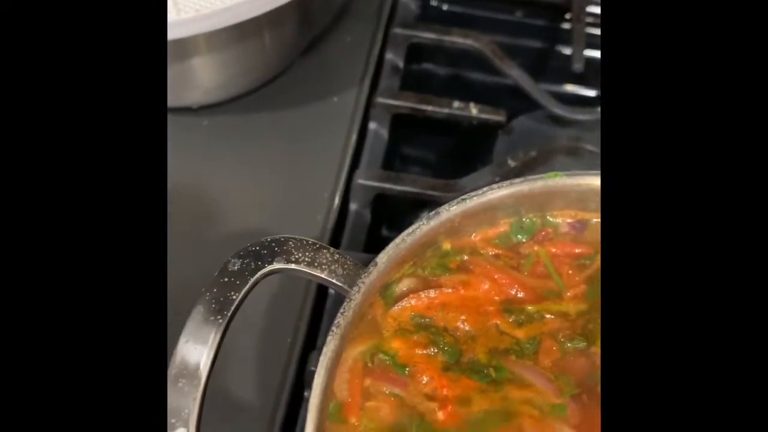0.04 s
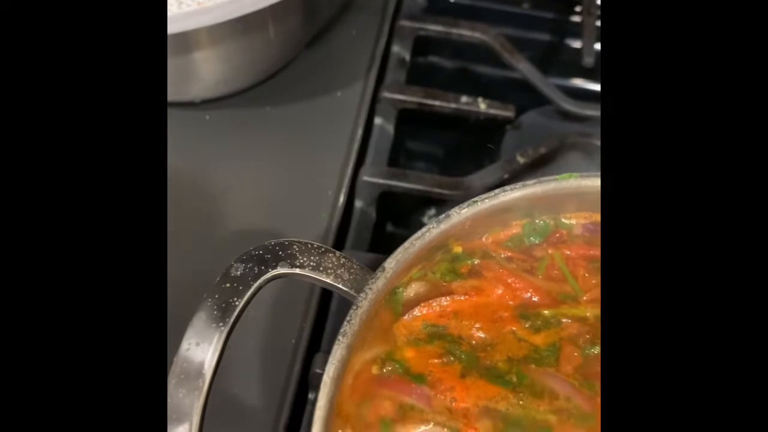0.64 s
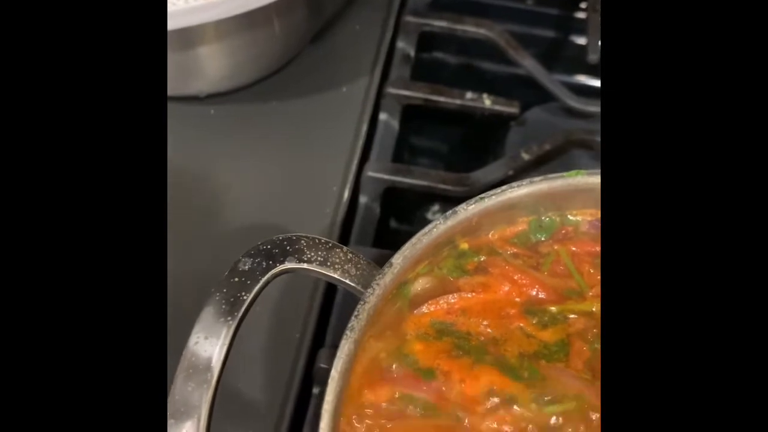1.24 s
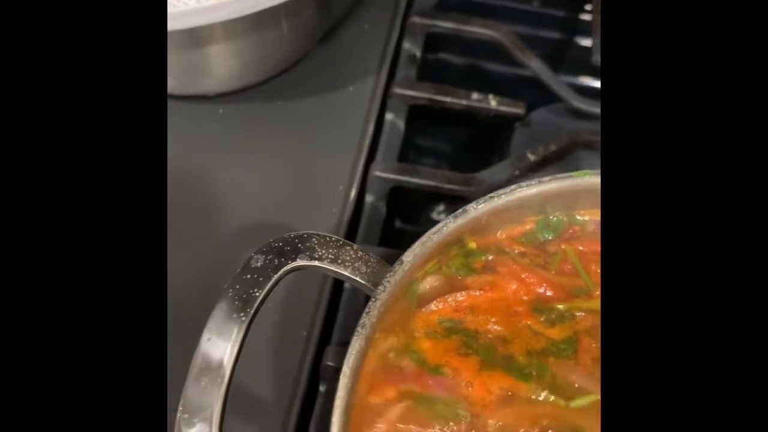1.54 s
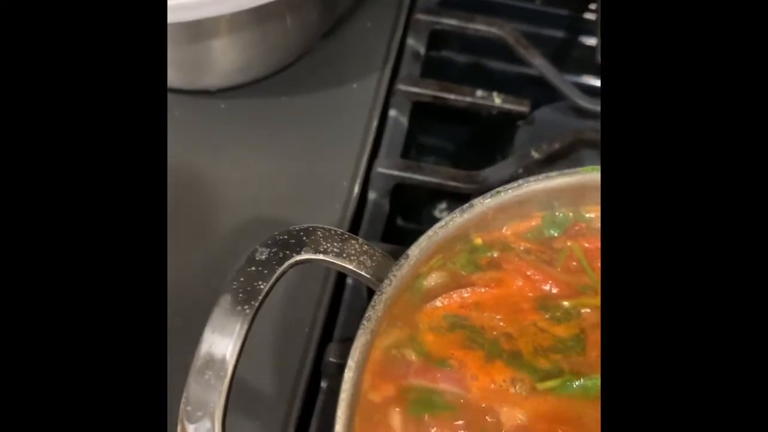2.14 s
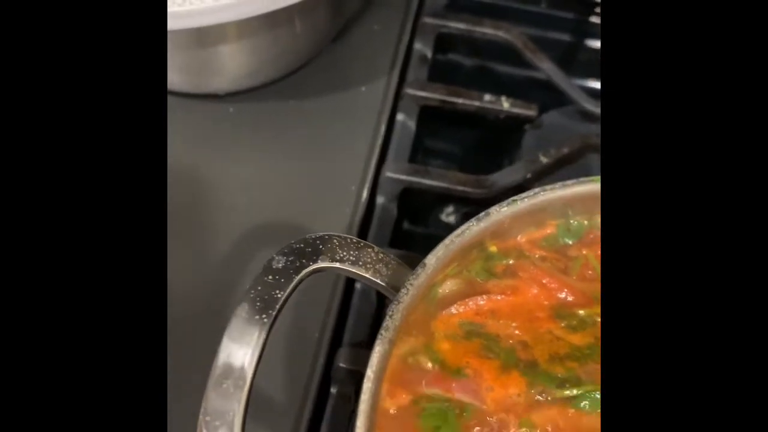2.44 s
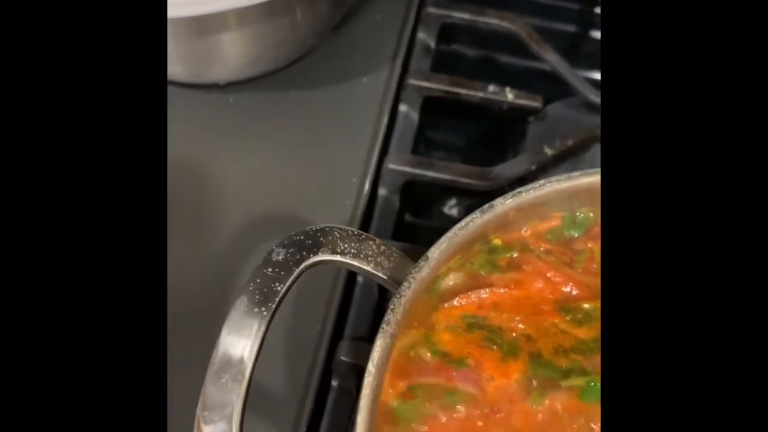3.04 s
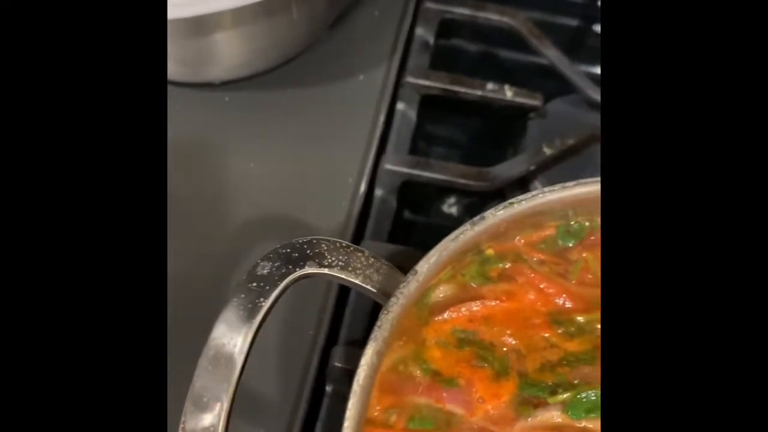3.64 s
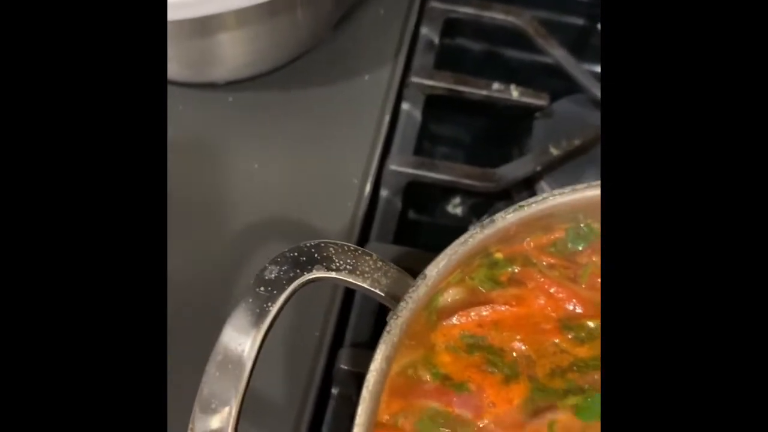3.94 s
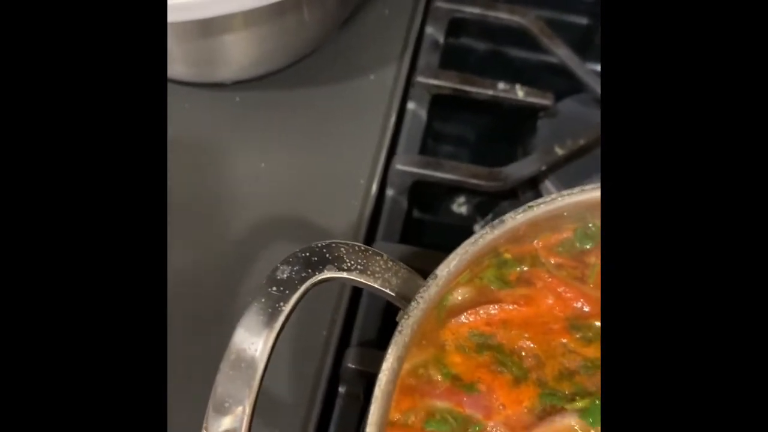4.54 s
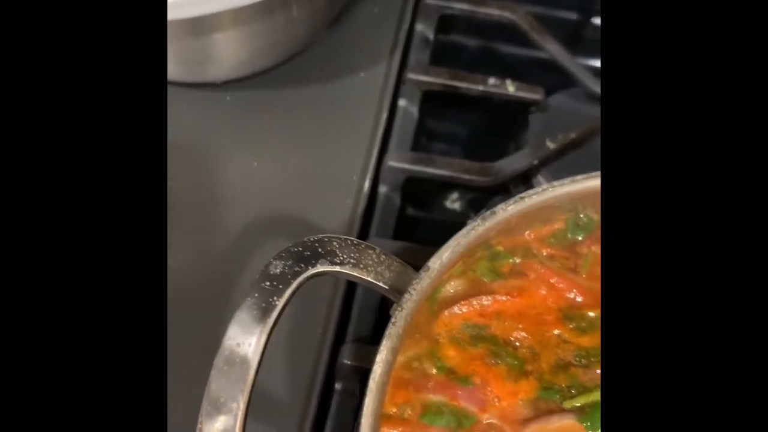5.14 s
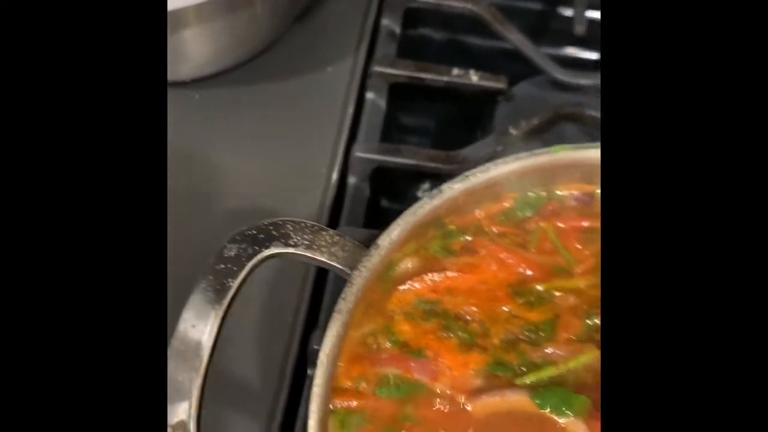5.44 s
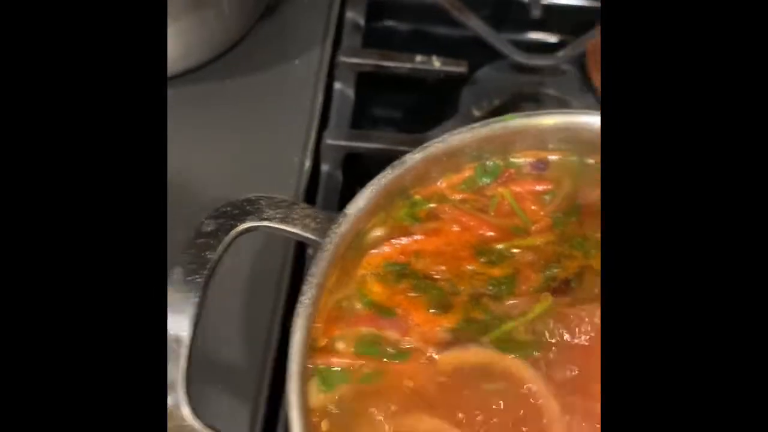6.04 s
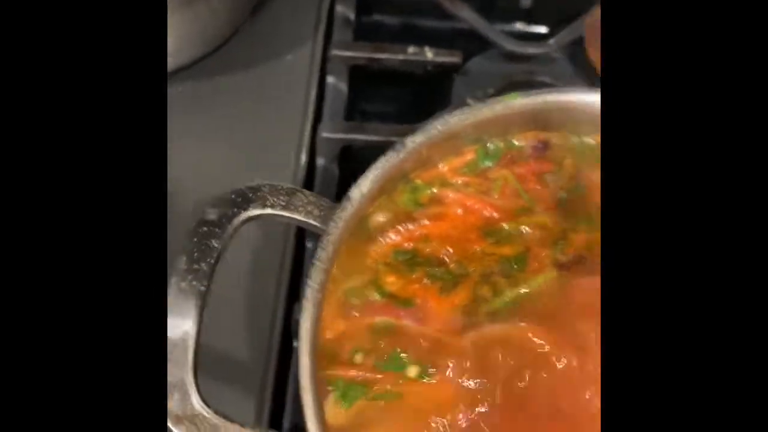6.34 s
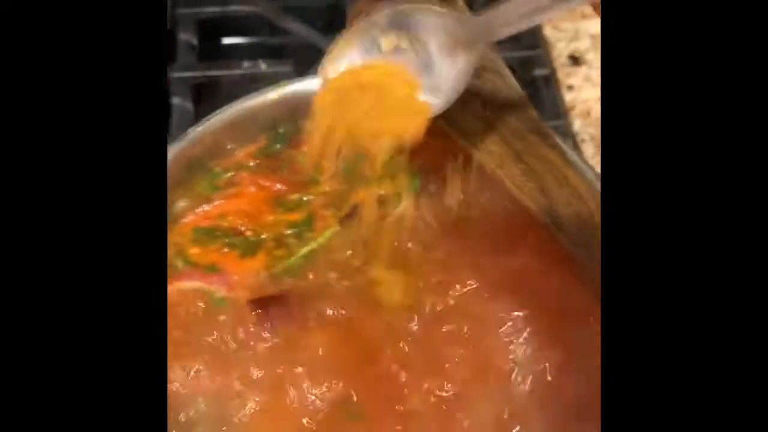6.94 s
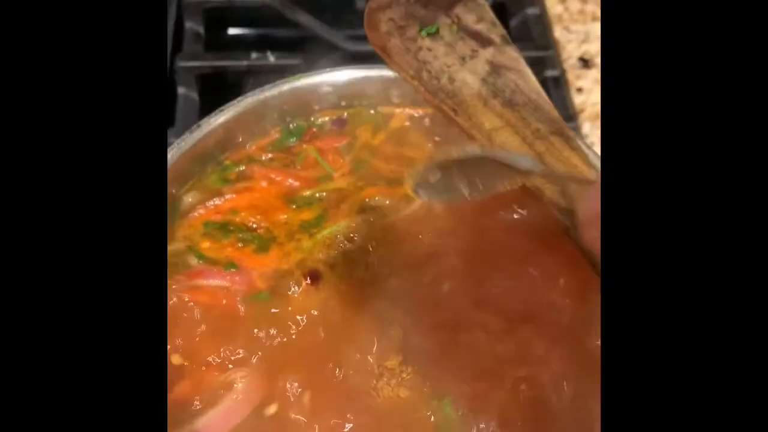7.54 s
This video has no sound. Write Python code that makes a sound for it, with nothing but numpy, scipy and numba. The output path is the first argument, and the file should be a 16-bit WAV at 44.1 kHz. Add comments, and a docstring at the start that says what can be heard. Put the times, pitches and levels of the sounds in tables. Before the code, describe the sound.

In a small kitchen, a plastic spice packet crinkles and snaps in uneven bursts while a spoon scrapes inside, bumps the bottom and scoops up powder. The packet falls quiet, leaving soup simmering with a soft fizz and small popping bubbles. Near the end, powder slides in faintly and the spoon gives one soft tap. A low gas flame rush and fan hum run underneath, heard close on a phone microphone.

```python
"""A plastic spice packet crinkles and pops: its film buckles, rubs and rings as a spoon scrapes inside
and scoops up powder. Beside it, in a small kitchen, soup simmers as bursting bubbles fizz and blip,
over the low rush of a gas flame, the hum of a fan and a thin whine. The packet is let go, powder
slides onto the soup, and one soft tap excites the spoon's modes. A phone's two ports hear it close by."""
import sys
import numpy as np
from scipy import signal
from scipy.fft import rfft, irfft
from scipy.io import wavfile
from scipy.ndimage import uniform_filter1d, map_coordinates
from numba import njit

SR = 44100
rng = np.random.default_rng(int(sys.argv[2]) if len(sys.argv) > 2 else 0)


def write(x):
    x = np.atleast_2d(x).T
    wavfile.write(sys.argv[1], SR, np.round(np.clip(x, -1, 1) * 32767).astype(np.int16))


N = 343539
TIME = np.arange(N) / SR
FREQ = np.fft.rfftfreq(N, 1 / SR)


def undb(db):
    """Amplitude ratio of a level in decibels."""
    return 10 ** (np.asarray(db) / 20)


def unit(x):
    """Normalisation to rms 1."""
    return x / np.sqrt(np.mean(x ** 2))


def over_time(table):
    """Linear interpolation of a (t/s, value) table at every sample."""
    return np.interp(TIME, *np.transpose(table))


def over_freq(table):
    """Interpolation of a (f/Hz, value) table on a log-frequency axis."""
    hz, value = np.transpose(table)
    return np.interp(np.log(FREQ + 1), np.log(hz + 1), value)


def colour(x, spectrum):
    """Minimum-phase filtering to a given spectrum; white noise keeps its power."""
    cepstrum = irfft(np.log(unit(undb(over_freq(spectrum)))), N)
    cepstrum[1:N // 2] *= 2
    cepstrum[N // 2:] = 0
    return irfft(rfft(x) * np.exp(rfft(cepstrum)), N)


def add(track, t, sound):
    """Superposition of a sound on a track, from time t."""
    start = int(t * SR)
    track[start:start + len(sound)] += sound[:N - start]


def fade(t60):
    """Exponential decay down to -60 dB."""
    return np.exp(-np.log(1000) * TIME[:int(t60 * SR) + 2] / t60)


def ring(hz, t60, glide=0):
    """Damped oscillation whose frequency rises by the fraction glide."""
    decay = fade(t60)
    t = TIME[:len(decay)]
    return decay * np.sin(2 * np.pi * hz * t * (1 + glide * t / t60 / 2))


def soften(tone, rise_s):
    """Exponential onset: a force of finite duration builds a vibration gradually."""
    return tone * (1 - np.exp(-TIME[:len(tone)] / rise_s))


def walk(rate):
    """Slow random modulation with a spread near 1, through rate values a second."""
    knots = rng.standard_normal(4096)
    return np.interp(TIME * rate, np.arange(len(knots)), knots)


def grains(rate, spread_db, t60):
    """Shot noise: random bursts of unequal size, evened in power over a few dozen ms."""
    onsets = rng.random(N) < rate / SR
    sizes = undb(spread_db * np.minimum(rng.exponential(size=N), 4))
    power = np.abs(signal.fftconvolve(onsets * sizes ** 2, fade(t60) ** 2)[:N])
    local_power = uniform_filter1d(power, SR // 16) + power.mean() / 10
    return unit(np.sqrt(power / local_power) * rng.standard_normal(N))


def pings(strength, low_hz, high_hz, t60, glide, count):
    """Damped oscillations at random times and pitches, mostly small, scaled by a strength curve."""
    out = np.zeros(N)
    for when, pitch, size in rng.random((count, 3)):
        tone = ring(low_hz * (high_hz / low_hz) ** pitch, t60, glide)
        add(out, when * N / SR, strength[int(when * N)] * size ** 2 * tone)
    return out


@njit
def resonator(x, hz, width_hz):
    """Second-order band-pass whose centre may move every sample."""
    y, band, low = np.empty(len(x)), 0., 0.
    for i in range(len(x)):
        g, damping = np.tan(np.pi * hz[i] / SR), width_hz / hz[i]
        v = (band + g * (x[i] - low)) / (1 + g * (g + damping))
        band, low, y[i] = 2 * v - band, low + 2 * g * v, damping * v
    return y


def resonance(x, hz, width_hz, stages=1):
    """Forced response of equal resonators in series, at a steady or moving frequency."""
    for _ in range(stages):
        x = resonator(x, hz * np.ones(len(x)), float(width_hz))
    return x


def squeeze(length, attack_s=0.0034, release_t60=0.081):
    """Envelope of one push: linear rise, hold and exponential relaxation."""
    hold = np.minimum(TIME[:int(length * SR)] / attack_s, 1)
    return np.concatenate([hold, fade(release_t60)])


# spectrum of the crackle as heard, with a notch at 4.6 kHz: f/Hz, level/dB
CRACKLE_SPECTRUM = [(1200, 1.5), (2100, 1.5), (2700, 3.5), (4000, 6.5), (4600, -16), (5200, 8.5), (6300, 3),
                    (7300, 7), (11000, 3.5), (15500, -1.5)]
def creases(strength, db=-2.5):
    """Buckling of small creases releases impulses, heard as a bright crackle."""
    return colour(grains(rate=300, spread_db=2.4, t60=.022), CRACKLE_SPECTRUM) * strength * undb(db)


# spectrum of the rubbed sheet: f/Hz, level/dB
SHEET_SPECTRUM = [(250, -9.5), (460, -0.5), (560, 2), (650, 8.5), (780, -6.5), (950, 4), (1130, 4.5),
                  (1400, 5), (2000, 9), (2700, -7.5), (5000, -7)]
def rubbing(strength, db=-3.5, muffle_hz=1300):
    """Friction excites the sheet's resonances, which slide as it stretches and slackens."""
    friction = colour(grains(rate=900, spread_db=1.6, t60=.025), SHEET_SPECTRUM)
    stretch = np.exp(.09 * walk(14))
    sheet = map_coordinates(friction, [np.cumsum(stretch)], mode="mirror")
    depth = np.interp(TIME, [2.3, 3.1], [0, 1])  # the rub turns hollow once the spoon is deep inside
    muffled = unit(signal.lfilter(*signal.butter(2, muffle_hz, fs=SR), sheet))
    return (np.sqrt(1 - depth) * sheet + np.sqrt(depth) * muffled) * strength * undb(db)


# spectrum of the flapping walls: f/Hz, level/dB
FLAP_SPECTRUM = [(60, -12.5), (130, -6), (200, -10), (380, -8.5), (600, -15), (1500, -26)]
def flapping(rub, db=-47, reference_db=-42, exponent=0.87):
    """Low-frequency wall motion grows as a power law of the rubbing."""
    strength = undb(db) * (rub / undb(reference_db)) ** exponent
    return colour(grains(rate=190, spread_db=-4, t60=0.027), FLAP_SPECTRUM) * strength


# squeezes and turns of the packet: t/s, duration/s, crackle level/dB, rub level/dB
SQUEEZES = [(0.0, 0.13, -43.5, -45), (0.174, 0.088, -42, -50.5), (0.361, 0.1, -49, -49.5),
            (0.51, 0.198, -43, -48), (0.756, 0.041, -34.5, -33.5), (0.874, 0.15, -42, -46),
            (0.924, 0.079, -38, -42), (1.158, 0.097, -52, -42.5), (1.21, 0.057, -34.5, -43),
            (1.325, 0.13, -41.5, -39.5), (1.523, 0.19, -50, -46.5), (1.728, 0.03, -45, -36.5),
            (1.893, 0.097, -55.5, -50), (2.013, 0.12, -46, -42.5), (2.124, 0.03, -37, -46),
            (2.17, 0.15, -46.5, -44), (2.347, 0.088, -37.5, -44), (2.448, 0.082, -60, -46.5),
            (2.66, 0.093, -53.5, -59), (2.938, 0.051, -53, -68), (3.016, 0.037, -43.5, -46),
            (3.099, 0.11, -60, -49), (3.262, 0.076, -44.5, -43.5), (3.36, 0.25, -61, -50.5),
            (3.592, 0.025, -38, -42), (3.615, 0.051, -41, -44), (3.673, 0.13, -48.5, -47.5),
            (3.887, 0.15, -54, -51.5), (4.274, .2, -41.5, -43.5), (4.513, 0.096, -40.5, -59)]
def handling(held_crackle_db=-58.5, held_rub_db=-55, let_go_s=4.61, let_go_fade_s=0.36):
    """Incoherent addition: squeezes and the held packet's faint stir sum in power."""
    held = np.clip(1 - (TIME - let_go_s) / let_go_fade_s, 0, 1)
    crackle_power = (undb(held_crackle_db) * held) ** 2
    rub_power = (undb(held_rub_db) * held) ** 2
    for t, length, crackle_db, rub_db in SQUEEZES:
        add(crackle_power, t, (undb(crackle_db) * squeeze(length)) ** 2)
        add(rub_power, t, (undb(rub_db) * squeeze(length)) ** 2)
    return np.sqrt(crackle_power), np.sqrt(rub_power)


def packet(panel_db=5, facet_db=2):
    """Thin-shell vibration: handling drives noise, and the modes of large panels and small facets."""
    crackle, rub = handling()
    crackle = crackle * tension()
    noise = creases(crackle) + rubbing(rub)
    panels = pings(rub * undb(panel_db), low_hz=600, high_hz=2200, t60=.045, glide=.04, count=1100)
    facets = pings(np.ones(N), low_hz=3100, high_hz=12000, t60=.016, glide=.02, count=2200)
    return noise + panels + facets * crackle * undb(facet_db) + flapping(rub)


# spectrum of the fizz as heard, with deep notches at 4.5 and 8 kHz: f/Hz, level/dB
FIZZ_SPECTRUM = [(900, -13), (2500, 5.5), (3400, 11.5), (4100, 13.5), (4500, -43), (5200, 13), (6300, -1),
                 (7300, 12.5), (8000, -26), (10000, 12.5), (13000, 13), (15500, 13.5)]
# strength of the simmer: t/s, level/dB
SIMMER = [(0, -56), (5, -57), (5.9, -56.5), (6.7, -56.8), (7.3, -56.5), (7.79, -58.5)]
def fizz(prick_db=-2.5):
    """Shot noise of the soup's froth, with sharper prickles at the rim."""
    froth = grains(rate=900, spread_db=2.2, t60=.007)
    pricks = grains(rate=260, spread_db=3.6, t60=.0008)
    strength = undb(over_time(SIMMER) + walk(5.7) / 2)
    return colour(unit(froth + undb(prick_db) * pricks), FIZZ_SPECTRUM) * strength


# narrow bands of the sizzle: f/Hz, bandwidth/Hz, level/dB
SIZZLE_BANDS = [(4090, 170, 2.5), (7030, 380, -1.5)]
# strength of the sizzle: t/s, level/dB
SIZZLE_LEVEL = [(0, -58), (5.1, -68.5), (5.5, -66.5), (6.4, -67.5), (6.8, -81), (7.79, -84)]
def sizzle():
    """Impulse excitation: tiny bursts at the rim ring two high resonances."""
    bursts = grains(rate=200, spread_db=3.2, t60=.002)
    bands = sum(undb(db) * resonance(bursts, hz, width) for hz, width, db in SIZZLE_BANDS)
    return unit(bands) * undb(over_time(SIZZLE_LEVEL))


# spectrum of the gas flame: f/Hz, level/dB
FLAME_SPECTRUM = [(20, -28), (33, -20), (48, -3.5), (65, 1), (90, -6), (130, -6.5), (180, -14), (280, -7.5),
                  (420, -14.5), (600, -22), (800, -22.5), (1000, -26.5), (1500, -28), (2200, -28),
                  (8000, -37.5), (16000, -49)]
def flame(db=-50):
    """Broadband combustion noise: a low rush whose level wavers slightly."""
    return unit(colour(rng.standard_normal(N), FLAME_SPECTRUM)) * undb(db + walk(8.9) / 2)


# tones of the fan: f/Hz, level/dB
FAN_TONES = [(49.3, -54), (98.5, -63.5), (156, -62), (198, -65), (220, -62), (247, -61), (1288, -92)]
def fan(gain_db=-1):
    """A line spectrum with random phase modulation, the higher tones less steady."""
    hum = np.zeros(N)
    for hz, db in FAN_TONES:
        wander = .6 * walk(min(hz / 14, 9))
        hum += undb(db + gain_db) * np.sqrt(2) * np.sin(2 * np.pi * hz * TIME + wander)
    return hum


# strength of the whine, clearer once the phone is over the pot: t/s, level/dB
WHINE_LEVEL = [(0, -75), (5.1, -72), (5.4, -71.5), (7.79, -73)]
def whine(hz=997, width_hz=8.4):
    """Narrow-band noise is heard as one thin, wavering pitch."""
    tone = resonance(rng.standard_normal(N), hz, width_hz, stages=2)
    return unit(tone) * undb(over_time(WHINE_LEVEL))


# larger bubbles bursting in the soup: t/s, level/dB, f/Hz
BURSTS = [(4.706, -51, 1080), (4.797, -46, 1210), (4.851, -50, 1380), (5.017, -51, 1240),
          (5.113, -43.5, 1310), (5.26, -56, 746), (5.634, -46, 1830), (5.877, -43.5, 1200),
          (6.11, -59, 760), (6.499, -49, 1600), (6.561, -46, 1220), (6.728, -49, 807), (6.76, -50, 810),
          (6.83, -46.5, 1170), (6.902, -44.5, 990)]
def bubbles(small_db=-52, blip_db=4, cycles=15, splash_db=-6, splash_t60=0.051):
    """Bubble resonance: small ones plip at random, rising in pitch; larger ones also splash."""
    blips = pings(np.full(N, undb(small_db)), low_hz=680, high_hz=2330, t60=0.065, glide=0.27, count=110)
    splashes = np.zeros(N)
    for t, db, hz in BURSTS:
        add(blips, t, undb(db + blip_db) * ring(hz, cycles / hz, glide=0.29))
        add(splashes, t, undb(db + splash_db) * fade(splash_t60))
    spray = unit(resonance(rng.standard_normal(N), hz=1300, width_hz=700))
    return blips + splashes * spray / 2


# creases snapping over: t/s, level/dB, low-band level relative to the treble/dB
SNAPS = [(0.0583, -32, -8), (0.0672, -25.5, -8), (0.0916, -26.5, -20), (0.106, -26, -21),
         (0.1294, -25, -20), (0.1529, -38, -20), (0.187, -24.5, -2.5), (0.2367, -20.5, -28),
         (0.406, -26, -26), (0.4245, -31, -20), (0.4405, -32, -4), (0.5135, -23.5, -12), (0.5428, -20, -8),
         (0.6168, -22, -18), (0.641, -30, -26), (0.6957, -15.5, -29), (0.766, -30, -21), (0.772, -22, -12),
         (0.784, -20, -10), (0.878, -37, -15), (0.9477, -25.5, -16), (0.9553, -23, -33), (0.971, -28, -20),
         (0.992, -24, -24), (1.1874, -36, -6), (1.2148, -21, -24), (1.2356, -24, -20), (1.2522, -23, -18),
         (1.27, -23.5, -23), (1.3037, -27.5, -7), (1.346, -23.5, -19), (1.3686, -23, -28),
         (1.3962, -19, -23), (1.4246, -25, -19), (1.505, -23.5, -33), (1.5315, -38, -22), (1.566, -31, -18),
         (1.6346, -35, -16), (1.668, -27.5, -2), (1.6996, -35, -21), (1.731, -21.5, -24),
         (1.8746, -26.5, -7.5), (1.905, -39, -16), (2.0136, -33, -9), (2.057, -25.5, -21),
         (2.1232, -26, -14), (2.1976, -18, -16), (2.2618, -29.5, -12), (2.2776, -26, -20),
         (2.3352, -20.5, -9), (2.373, -26.5, -5), (2.38, -22.5, -12), (2.3975, -24.5, -18),
         (2.461, -41, 11), (2.514, -50, -12), (2.564, -31, -10), (2.678, -24, -11), (2.7461, -33, -10),
         (2.7607, -35, -4), (2.807, -31, -24), (2.969, -37, -14), (3.278, -36, -14), (3.304, -36, -7),
         (3.3464, -39, -7), (3.4064, -38.5, -3), (3.46, -35.5, -21), (3.569, -29.5, -19),
         (3.5928, -19, -17), (3.659, -23.5, -9), (3.74, -44, -6), (3.7973, -25, -24), (3.92, -34.5, -12),
         (3.9487, -31.5, -21), (3.9755, -34, -22), (4.225, -34, -0.5), (4.2615, -36, -1), (4.2772, -31, -6)]
# spectrum of a snap's first instant: f/Hz, level/dB
TICK_SPECTRUM = [(2000, -18), (7000, -2), (14000, -10)]
def snaps(crack_db=-8.5, tick_db=-6, body_db=-5, settle_db=-15.5, ring_db=-16,
          low_hz=3000, high_hz=12500):
    """Snap-through buckling: a big crease cracks, nearby facets ring and smaller creases settle."""
    bright, dull, ticks, rings = np.zeros((4, N))
    for t, db, low_db in SNAPS:
        for burst in fade(t60=0.023), undb(settle_db) * fade(t60=0.18):
            add(bright, t, undb(db + crack_db) * burst)
            add(dull, t, undb(db + low_db + body_db) * burst)
        add(ticks, t, undb(db + tick_db) * fade(t60=0.0015))
        for pitch in rng.random(size=4):
            add(rings, t, undb(db + ring_db) * ring(low_hz * (high_hz / low_hz) ** pitch, t60=0.062))
    crack = colour(bright * grains(rate=4000, spread_db=1.3, t60=.003), CRACKLE_SPECTRUM)
    tick = colour(ticks * rng.standard_normal(N), TICK_SPECTRUM)
    body = colour(dull * rng.standard_normal(N), SHEET_SPECTRUM)
    return crack + tick + body + rings


def tension(hold_s=0.0019, hush_db=-4):
    """Elastic loading: the crackle dips while a crease takes up strain, just before it snaps."""
    strain = np.zeros(N)
    for t, *_ in SNAPS:
        add(strain, max(t - hold_s, 0), np.sqrt(np.linspace(0, 1, int(hold_s * SR))))
    return undb(hush_db * np.minimum(strain, 1))


# hollow pops of the packet's walls: t/s, f/Hz, level/dB, T60/s
WALL_POPS = [(0.359, 347, -29.5, 0.02), (0.542, 463, -27, 0.03), (0.543, 888, -38.5, 0.085),
             (0.697, 1920, -20.5, 0.023), (0.783, 910, -28, 0.042), (0.785, 467, -28.5, 0.062),
             (0.998, 176, -35.5, 0.096), (1.765, 186, -32.5, 0.05), (2.038, 1900, -26, 0.019),
             (2.102, 197, -25.5, 0.053), (2.159, 1840, -29, 0.018), (3.408, 636, -33, .05),
             (3.658, 402, -39, 0.12), (3.877, 980, -32.5, 0.028), (3.92, 1740, -37, .04),
             (4.519, 1300, -39, .08), (4.52, 1730, -34, 0.073)]
def pops():
    """Free vibration: a wall buckles and rings briefly, rising in pitch."""
    out = np.zeros(N)
    for t, hz, db, t60 in WALL_POPS:
        add(out, t, undb(db) * soften(ring(hz, t60, glide=0.16), rise_s=0.0004))
    return out


# drags of the spoon along a wall: t/s, duration/s, f/Hz, bandwidth/Hz, level/dB
SCRAPES = [(0.574, 0.06, 594, 260, -43.5), (.785, 0.02, 885, 300, -36.5), (1.74, 0.041, 820, 400, -44.5),
           (2.325, 0.11, 1080, 110, -45.5), (3.287, 0.05, 1040, 200, -51), (3.613, 0.041, 694, 300, -45),
           (3.62, 0.058, 1030, 260, -43), (3.702, 0.11, 660, 280, -48.5), (3.709, 0.33, 1050, 380, -55),
           (4.283, 0.036, 650, 260, -46), (4.44, 0.04, 320, 200, -51), (4.525, 0.08, 5200, 3200, -49.5)]
def scrapes(sway=0.041):
    """Forced vibration: friction drives one resonance of a wall, which drifts as the wall flexes."""
    out = np.zeros(N)
    flex = 1 + sway * walk(14)
    for t, length, hz, width_hz, db in SCRAPES:
        push = squeeze(length)
        centre_hz = hz * flex[int(t * SR):][:len(push)]
        friction = rng.standard_normal(SR)[:len(push)]
        add(out, t, undb(db) * push * unit(resonance(friction, centre_hz, width_hz, stages=2)))
    return out


# the spoon bumps the packet's bottom and rebounds: t/s, level/dB
KNOCKS = [(2.1351, -38.5), (2.138, -27), (2.16, -34.5)]
# modes of the powder-filled packet: f/Hz, level/dB, T60/s
PACKET_MODES = [(152, -0.5, 0.088), (277, 10.5, 0.021), (460, -4, 0.068), (704, 13, 0.015), (995, 3, 0.036),
                (1500, 0, 0.021)]
def knocks():
    """Modal response to a soft impact: heavily damped modes sum to a hollow thud."""
    out = np.zeros(N)
    for t, db in KNOCKS:
        for hz, mode_db, t60 in PACKET_MODES:
            add(out, t, undb(db + mode_db) * soften(ring(hz, t60), rise_s=0.0023))
    return out


# pushes of the spoon into the powder: t/s, duration/s, level/dB
SCOOPS = [(4.302, 0.099, -37), (4.36, 0.088, -37), (4.515, 0.023, -42), (4.55, 0.075, -50)]
# modes of the spoon's bowl, damped by powder: f/Hz, bandwidth/Hz, level/dB
BOWL_MODES = [(1050, 29, 2), (1154, 34, 7), (1310, 20, -3), (1453, 37, 11), (1650, 30, 5), (1900, 50, 3)]
def scoop(empty_hz=905, full_hz=1620, fill_s=0.094, bowl_db=-1):
    """Cavity resonance: grinding powder sounds the bowl and the hollow, whose pitch rises as it fills."""
    power = np.zeros(N)
    for t, length, db in SCOOPS:
        add(power, t, (undb(db) * squeeze(length)) ** 2)
    filled = np.clip((TIME - SCOOPS[0][0]) / fill_s, 0, 1)
    hollow_hz = empty_hz + filled * (full_hz - empty_hz)
    grind = grains(rate=1500, spread_db=1.5, t60=.006)
    hollow = resonance(grind, hollow_hz, width_hz=690, stages=2)
    bowl = sum(undb(db) * resonance(hollow, hz, width) for hz, width, db in BOWL_MODES)
    return np.sqrt(power) * unit(unit(hollow) + undb(bowl_db) * unit(bowl))


# powder sliding off the spoon onto the soup: t/s, level/dB
POUR_LEVEL = [(6.85, -92), (7.0, -60.5), (7.1, -56), (7.25, -68), (7.4, -88)]
# modes of the emptied spoon: f/Hz, level/dB, T60/s
SPOON_MODES = [(1060, -1.5, 0.18), (1420, -3, 0.1), (1720, 6, 0.049), (2660, 1, 0.055)]
def pour_and_tap(tap_s=7.44, contact_db=-51, ring_db=-49):
    """Sliding friction hisses as the powder leaves; one soft impact then rings the spoon's modes."""
    contact = undb(over_time(POUR_LEVEL))
    add(contact, tap_s, undb(contact_db) * fade(t60=0.15))
    out = unit(resonance(rng.standard_normal(N), hz=1600, width_hz=2500)) * contact
    for hz, mode_db, t60 in SPOON_MODES:
        add(out, tap_s, undb(ring_db + mode_db) * ring(hz, t60))
    return out


def bending(x, stiff_hz=1100, depth_db=3.8):
    """Spectral modulation: bending shifts the film's high resonances, colouring each crackle anew."""
    hz, _, spectra = signal.stft(x, nperseg=256)
    ripple = uniform_filter1d(rng.standard_normal(spectra.shape), size=6, axis=0)
    ripple_db = depth_db * unit(uniform_filter1d(ripple, size=10, axis=1))
    gain = undb(np.minimum(hz / stiff_hz, 1)[:, None] * ripple_db)
    band_rms = np.sqrt(np.mean(gain ** 2, axis=1, keepdims=True))
    return signal.istft(spectra * gain / band_rms)[1][:N]


def kitchen(x, t60=0.07, delay_s=.003, wet_db=-10, dull_hz=4000):
    """Early reflections: counter and walls return a short, dull tail."""
    decay = fade(t60)
    tail = rng.standard_normal(N)[:len(decay)] * decay * (TIME[:len(decay)] > delay_s)
    tail = signal.lfilter(*signal.butter(1, dull_hz, fs=SR), tail / np.linalg.norm(tail))
    return x + undb(wet_db) * signal.fftconvolve(x, tail)[:N]


def diffuse(x, t60=.24):
    """Diffuse field: many reflected paths keep the level and scramble the phase."""
    decay = fade(t60)
    paths = rng.standard_normal(len(decay)) * decay
    return signal.fftconvolve(x, paths / np.linalg.norm(paths))[:N]


# lead of the left microphone port: f/Hz, phase/rad
PORT_LEAD = [(0, 0), (300, -.3), (600, -1.2), (1120, -1.5), (1260, 1.1), (2200, 1.5), (2750, 2.6),
             (3600, 1.5), (4200, 2), (4720, 3.14), (6350, 6.2), (6950, 6.4), (8930, 9.42), (10700, 12.5),
             (11350, 12.7), (13200, 15.7), (15000, 18.8), (16500, 19)]
# left port minus right: f/Hz, level/dB
PORT_BALANCE = [(60, 0), (400, -.3), (750, -1.2), (1000, -3), (1250, -3.5), (2000, 0), (15000, 0)]
# sound the ports do not share: f/Hz, fraction
PORT_INCOHERENCE = [(30, .015), (130, .04), (250, .08), (600, .35), (1200, .5), (2600, .45), (3600, .22),
                    (4700, .01), (5800, .14), (6700, .02), (8000, .12), (9000, .01), (10200, .1),
                    (13200, .02), (15000, .1)]
def ports(x):
    """Partial coherence: two spaced ports differ in phase, level and diffuse sound."""
    spread = over_freq(PORT_INCOHERENCE) / 2
    lead = np.interp(FREQ, *np.transpose(PORT_LEAD))
    side = np.array([[1], [-1]])  # left, right
    heard = np.sqrt(1 - spread) * rfft(x) + side * np.sqrt(spread) * rfft(diffuse(x))
    balance = undb(side * over_freq(PORT_BALANCE) / 2)
    return irfft(heard * balance * np.exp(1j * side * lead / 2), N)


def scene():
    """Superposition: packet, spoon and soup with their reflections, over flame, fan and whine."""
    crinkle = bending(packet() + snaps())
    spoon = knocks() + scrapes() + scoop() + pour_and_tap()
    soup = fizz() + bubbles() + sizzle()
    return ports(kitchen(crinkle + pops() + spoon + soup) + flame() + fan() + whine())


def record(dry):
    """Band limiting: the phone's steep low-pass cuts the treble above 15.8 kHz."""
    return signal.sosfilt(signal.ellip(10, .2, 70, 15800, fs=SR, output="sos"), dry)


dry = scene()
out = record(dry)
write(out)
```